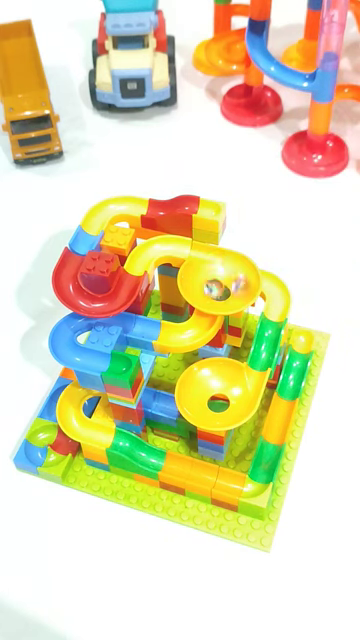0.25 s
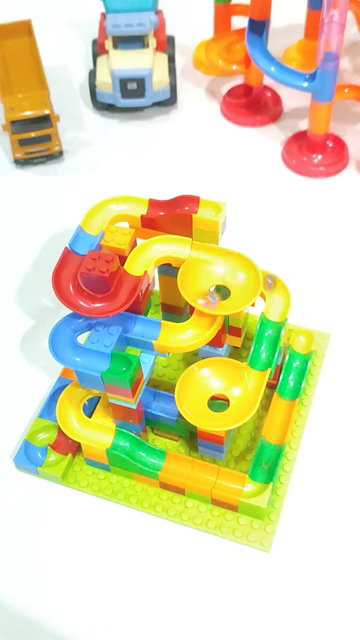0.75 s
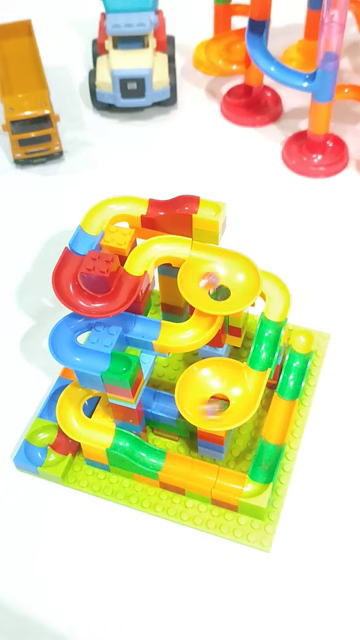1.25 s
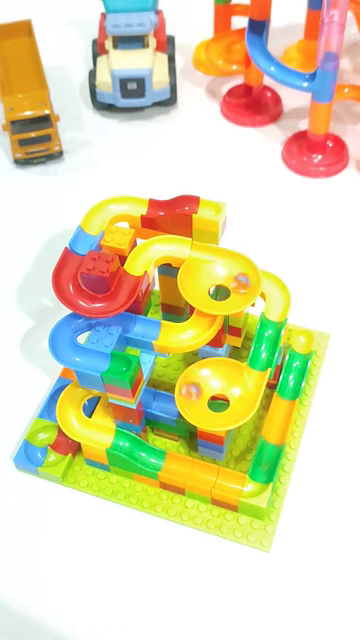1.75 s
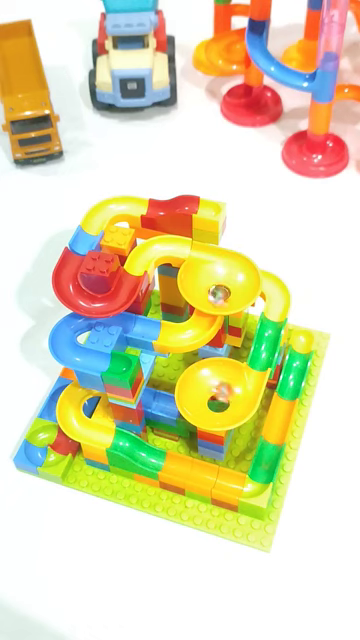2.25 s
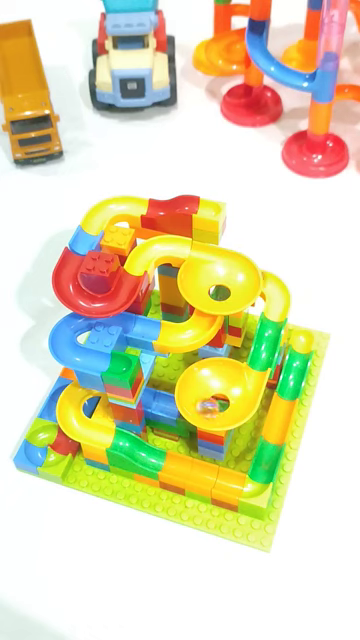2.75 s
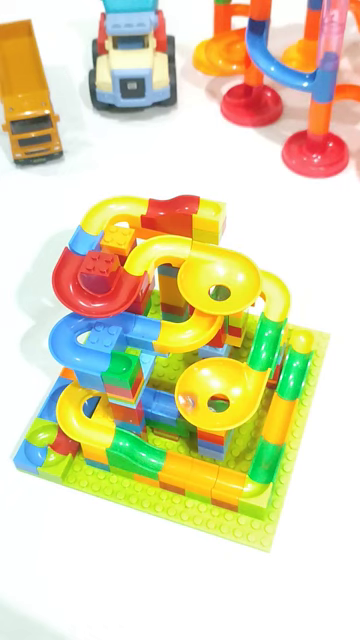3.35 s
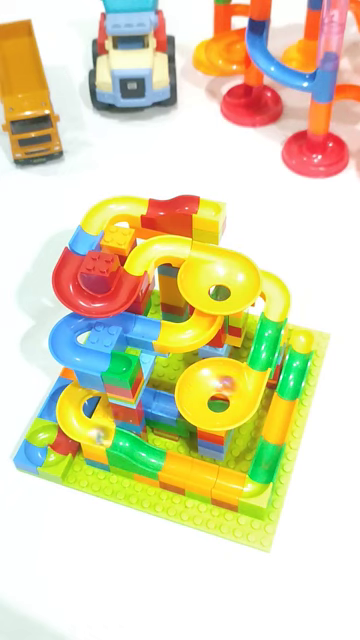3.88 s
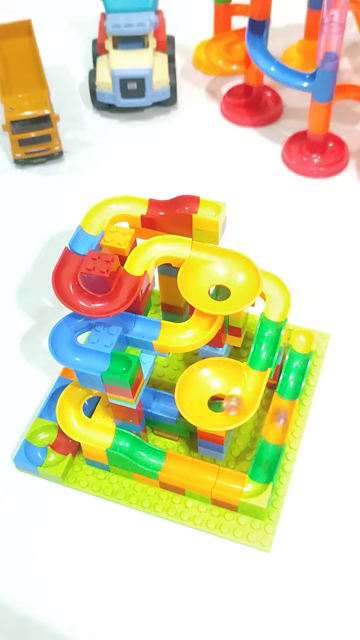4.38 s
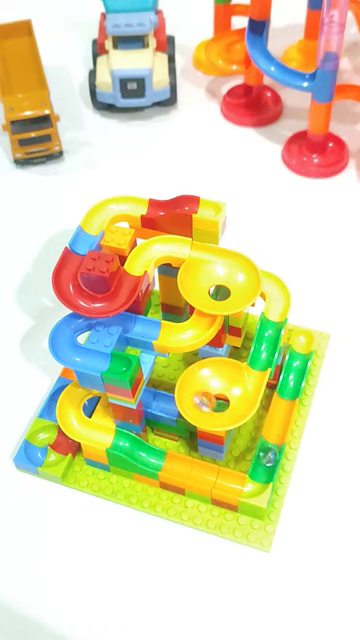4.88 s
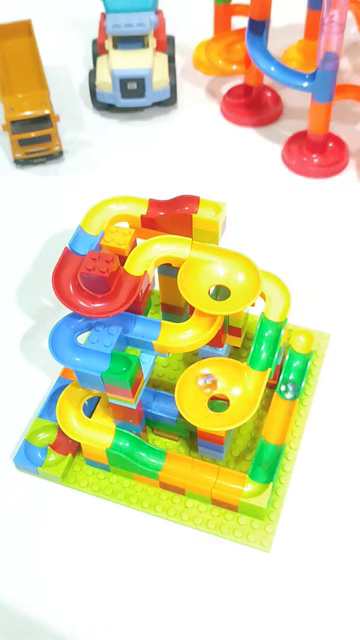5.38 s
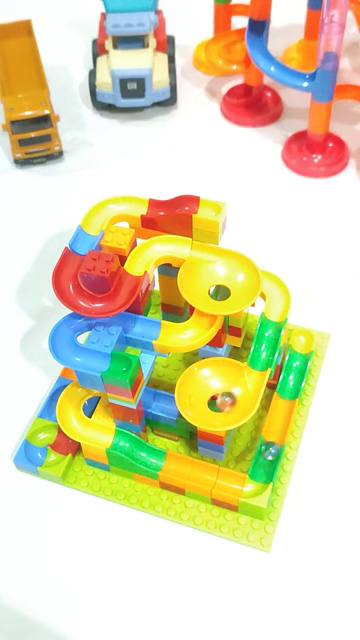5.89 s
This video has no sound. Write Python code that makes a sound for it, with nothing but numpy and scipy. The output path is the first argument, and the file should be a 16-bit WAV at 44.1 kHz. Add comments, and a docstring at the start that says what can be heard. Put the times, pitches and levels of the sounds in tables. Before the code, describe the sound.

Indoors, close to a toy track of hollow plastic, glass marbles are already rolling. Their grainy, mid-pitched rumble and lighter rasp pulse unevenly about six times a second as they swoop around funnels and bends. Small glass clinks come near 0.3 s; a clattering group of clacks and a bouncing drop follows at 0.65-0.85, another drop at 1.2. From 1.4 to 2.5 the rolling is softer, with sparse light taps. Drops and knocks thicken at 2.7, another rebounding drop lands at 3.2, and the hardest, sharpest clack strikes at 3.5, followed by quick knocks. Between 4.1 and 4.4 bright, very short glass clinks crowd together over thinner rolling. A double-bounce drop sounds at 4.6, crisp clinks at 5.2, then softer rolling, a last swell near 5.65 and tiny ticks to 6.1. Brief bright room echoes, faint noise and wavering low hum remain underneath.

```python
"""Glass marbles roll down a plastic toy track: streams of tiny bumps ring through its resonances,
swelling about six times a second as marbles swoop round funnels and bends.
Marbles drop and knock on hollow plastic: many short, dying tones make the boom, clack and tick.
Clinks of glass are very short bursts of coloured noise. A small, hard-walled room answers with
echoes, over faint noise and a wavering hum."""
import sys
import numpy as np
from scipy import signal
from scipy.fft import rfft, irfft, next_fast_len
from scipy.io import wavfile
from scipy.ndimage import uniform_filter1d

SR = 44100
rng = np.random.default_rng(int(sys.argv[2]) if len(sys.argv) > 2 else 0)


def unload_wav(signal):
    """Save mono or channel-first audio to the path in sys.argv[1] as 16-bit WAV at rate SR, clipped to [-1, 1]."""
    wavfile.write(
        sys.argv[1],
        SR,
        np.round(np.clip(np.atleast_2d(signal).T, -1, 1) * 32767).astype(np.int16),
    )


N = 270333
TIME = np.arange(N) / SR
AGE = TIME[:int(.09 * SR)]   # seconds since a blow began


def from_db(db):
    """Turn decibels into a plain gain."""
    return 10 ** (np.asarray(db) / 20)


def rms_one(x):
    """Scale to an rms of 1."""
    return x / np.sqrt(np.mean(x ** 2) + 1e-20)


def attack_one(sound):
    """Scale a blow to rms 1 over its first 8 ms."""
    return sound / np.sqrt(np.mean(sound[:, :SR // 125] ** 2))


def at_hz(points, hz, axis=1):
    """Read one column of a table on a log-frequency axis."""
    points = np.array(points)
    return np.interp(np.log(np.maximum(hz, 1)), np.log(points[:, 0]), points[:, axis])


def filtered(sound, order, edge_hz, kind):
    """Keep only the part of a sound that the chosen filter lets through."""
    return signal.sosfilt(signal.butter(order, edge_hz, kind, fs=SR, output="sos"), sound)


def add(out, s, sound, pan_db):
    """Mix a stereo sound in at a time and a place; positive pan leans left."""
    start = max(round(s * SR), 0)
    gains = rms_one(from_db([[pan_db / 2], [-pan_db / 2]]))
    out[:, start:start + sound.shape[1]] += (gains * sound)[:, :max(N - start, 0)]


def drift(rate):
    """Smooth chance with spread 1, heading for a new value `rate` times a second."""
    knots = rng.standard_normal(4096)
    return np.interp(TIME * rate, np.arange(len(knots)), knots) * np.sqrt(3 / 2)


def ripple(hz, spacing_hz):
    """Chance hills and valleys over frequency, spread about 1: they depend on where the blow lands."""
    return np.interp(hz / spacing_hz, np.arange(256), rng.standard_normal(256)) * np.sqrt(3 / 2)


def bump(hz, centre, octaves):
    """A hill of height 1 on the pitch axis."""
    return 1 / (1 + (np.log2(hz / centre) / octaves) ** 2)


# How alike left and right are: pitch_hz, likeness (0 to 1)
LEFT_RIGHT_LIKENESS = [(50, 0.78), (300, 0.27), (700, 0.89), (1400, 0.68), (3000, 0.51), (6000, 0),
                       (14000, 0.03)]


def spread(mid, side, hz):
    """Two unrelated signals become left and right, as alike as the table says at each pitch."""
    alike = np.clip(at_hz(LEFT_RIGHT_LIKENESS, hz), -.99, .99)
    return np.sqrt(1 + alike) * mid + np.sqrt(1 - alike) * side * np.array([[1], [-1]])


def coloured(pair, colour):
    """Two unrelated signals become a stereo sound shaped by a colour table; rms 1."""
    size = next_fast_len(N)
    hz = np.arange(size // 2 + 1) * SR / size
    spectrum = spread(*rfft(pair, size), hz) * from_db(at_hz(colour, hz))
    return rms_one(irfft(spectrum, size)[:, :N])


# Colour of the still room's noise: pitch_hz, relative_level_db
AIR_COLOUR = [(20, -37.5), (31, -1.5), (41, 3.5), (55, -1.5), (80, -1), (100, -9), (128, -7), (200, -16),
              (330, -20.5), (700, -21.5), (1500, -32.5), (3500, -31.5), (8000, -39.5), (14000, -41.5)]
# Faint hum tones before their swell: pitch_hz, level_db
HUM_TONES = [(80, -76), (161, -76)]
# Slow swell of the hum: time_s, gain_db
HUM_SWELL = [(0, 0), (1.6, 9.5), (2.3, -0.5), (3.2, 4), (3.8, -5.5), (6.1, 2)]


def still_room(air_db=-63, waver_db=2):
    """Coloured noise makes low rumble and faint hiss; sines of wavering level and phase make the hum."""
    sound = from_db(air_db) * coloured(rng.standard_normal((2, N)), AIR_COLOUR)
    swell_db = np.interp(TIME, *np.transpose(HUM_SWELL))
    for hz, db in HUM_TONES:
        level = from_db(db + swell_db + waver_db * drift(1.5))
        sound = sound + level * np.sin(2 * np.pi * hz * TIME + .5 * drift(2.07))
    return sound * from_db([[-.6], [.6]])   # a little stronger on the right


# The room's echoes: pitch_hz, time_to_fall_60_db_s, echo_energy_against_direct_sound_db
ROOM_ECHOES = [(390, 0.27, -12), (1260, 0.19, -6.5), (3020, 0.26, -6), (6970, 0.36, -7),
               (14000, 0.25, -6.5)]


def room(x, build_s=0.0053, thicken_s=.05):
    """Separate early reflections thicken into a tail that dies band by band."""
    age = TIME[:int(.6 * SR)]
    edges = np.geomspace(250, 17000, 11)
    density = np.minimum(.015 + .05 * (age / thicken_s) ** 2, 1)   # reflections per sample
    arrivals = (rng.random(len(age)) < density) / np.sqrt(density)
    response = 0
    for low, high in zip(edges, edges[1:]):
        hz = np.sqrt(low * high)
        echoes = filtered(arrivals * rng.standard_normal((2, len(age))), 2, [low, high], "band")
        decay = from_db(-60 * age / at_hz(ROOM_ECHOES, hz))
        build = 1 - np.exp(-(age / build_s) ** 2)
        tail = rms_one(spread(*echoes, hz) * decay * build)
        band_share = np.sqrt(2 * (high - low) / SR / len(age))   # a wider band holds more energy
        response = response + tail * from_db(at_hz(ROOM_ECHOES, hz, axis=2)) * band_share
    return signal.fftconvolve(x, response, axes=1)[:, :N]


def grazes(count=14, level_db=-64):
    """Faint grazing touches of glass at random moments."""
    return [(when * N / SR, level_db, 0) for when in rng.random(count)]


# Glass clinks on another marble or a hard edge: start_s, level_db (energy as if over 3 ms),
# brightness_db (treble tilt per octave, up to 0.6 octave either side of 9500 Hz)
GLASS_CLINKS = [(0.074, -42.5, -26), (0.2533, -39, -4), (0.2701, -36, 4), (0.2901, -54, -6),
                (0.3146, -46.5, 3), (0.5922, -47.5, 3), (0.615, -57, 4), (1.186, -43, 2), (1.2365, -49, -6),
                (1.5924, -53, 9), (1.6189, -54, 3), (1.6386, -52.5, 3), (1.7101, -44, 4.5),
                (1.99, -54.5, -4), (2.0607, -47, 0), (2.0819, -47.5, -2), (2.403, -49.5, -9),
                (2.5137, -47.5, 3), (3.7756, -53, -5), (3.8231, -47.5, -8), (3.8297, -51, -10),
                (3.8866, -44.5, 1), (4.0147, -49, -3), (4.098, -29.5, 2), (4.199, -29, -1),
                (4.2892, -30, 6), (4.3484, -33, 3), (4.3534, -47, -4), (4.3604, -34.5, -4),
                (4.3652, -38, -2), (4.398, -28, 1), (4.7227, -50.5, -4), (4.7442, -41.5, -4.5),
                (4.839, -49.5, -10), (5.053, -54.5, -5), (5.0899, -52, -5), (5.2065, -31, 0),
                (5.2163, -28, 1.5), (5.3605, -40.5, -5), (5.5871, -47.5, -6), (5.6179, -39.5, -4),
                (5.6365, -39, -4), (5.7087, -51, 1), (5.7328, -37.5, 1), (5.8844, -48.5, -13),
                (6.0042, -50, -4)]
# Colour of a clink: pitch_hz, relative_level_db
GLASS_COLOUR = [(600, -53), (1500, -7), (2500, -8.5), (4000, -4), (6000, 1.5), (7700, 5), (9700, -1),
                (12300, 0.5), (13800, -0.5), (15500, -47)]


def clinks(crack_s=0.00028, ring_s=0.0072, ring_db=-14, patchy_db=3, room_db=2, pan_db=-2.5):
    """Glass on glass: a crack under a millisecond, scattered briefly by the track.

    Gives the direct sound and what is sent to the room."""
    direct, feed = np.zeros((2, 2, N))
    size = 1024
    age = AGE[:size]
    hz = np.arange(size // 2 + 1) * SR / size
    fade = np.exp(-age / crack_s) + from_db(ring_db) * np.exp(-age / ring_s)
    fade = fade * (1 - np.exp(-age / .0001))   # a very short fade-in softens the clink's start
    for s, level_db, bright_db in list(GLASS_CLINKS) + grazes():
        tilt_db = bright_db * np.clip(np.log2((hz + 1) / 9500), -.6, .6)
        colour = from_db(at_hz(GLASS_COLOUR, hz) + tilt_db + patchy_db * ripple(hz, spacing_hz=703))
        phases = np.exp(2j * np.pi * rng.random((2, len(hz))))
        crack = filtered(irfft(colour * phases) * fade, 2, 1100, "high")
        energy = np.sum(crack ** 2, axis=1, keepdims=True)
        crack = from_db(level_db) * crack / np.sqrt(energy / (.003 * SR))
        add(direct, s, crack, pan_db)
        add(feed, s, crack * from_db(room_db), 0)
    return direct, feed


def resonance_db(resonances, hz, between_db):
    """Gain of a set of resonances, with shallow valleys between them."""
    power = from_db(between_db) ** 2
    for centre, width, db in resonances:
        power = power + from_db(db) ** 2 / (1 + (2 * (hz - centre) / width) ** 2)
    return 10 * np.log10(power)


# Resonances of the stacked blocks that every blow shakes: pitch_hz, width_hz, gain_db
BLOCK_RESONANCES = [(551, 12, 7.5), (765, 35, 1.5), (1118, 20, 6.5), (1370, 96, -9), (1428, 40, 3),
                    (1646, 60, 5.5), (2815, 89, -6.5), (3484, 22, -15.5), (3580, 24, -12), (4170, 94, -1.5),
                    (4980, 35, 7), (6130, 180, -1.5), (6740, 99, 3), (7640, 240, 3.5), (8430, 230, 1.5)]


def plastic(colour, t60, count):
    """Crowded modes (natural tones) of a moulded piece: their pitches, levels in dB and dying sines."""
    hz = np.geomspace(colour[0][0], colour[-1][0], count) * (1 + rng.uniform(-.003, .003, count))
    decay_s = t60 * from_db(rng.normal(0, 2.45, (count, 1)))   # each mode dies at its own pace
    level_db = at_hz(colour, hz) + resonance_db(BLOCK_RESONANCES, hz, between_db=-3.5)
    sines = np.sin(2 * np.pi * hz[:, None] * AGE) * from_db(-60 * AGE / decay_s)
    return hz, level_db, sines


def strike(modes, accent_db):
    """Each blow meets the modes with new signs and its own accent."""
    hz, level_db, sines = modes
    mid, side = rng.choice([-1, 1], (2, len(hz)))
    return attack_one((spread(mid, side, hz) * from_db(level_db + accent_db)) @ sines)


def ping(hz, t60):
    """The one mode right under the marble; the two sides hear it a little out of step."""
    lag_s = rng.normal(0, 5e-5, (2, 1))
    return attack_one(np.sin(2 * np.pi * hz * (AGE + lag_s)) * from_db(-60 * AGE / t60))


def blow_sounds(blows, peak_octaves=0.13, snap_s=0.012, wall_trim_db=-1.0, tick_trim_db=-1.5):
    """A marble lands on plastic: the hollow piece booms, its thin wall clacks, the contact ticks."""
    cavity = plastic([(430, -21.5), (600, -14.5), (850, -2.0), (1200, 3), (2050, 3.0)], t60=0.098, count=130)
    wall = plastic([(2000, -1.5), (3300, -0.5), (4200, -3), (4800, -9.5)], t60=0.044, count=120)
    tick = plastic([(4700, 3.5), (7500, 3.5), (10000, -4), (13000, -4), (15000, -23)], t60=0.039, count=170)
    out = np.zeros((2, N))
    for s, cavity_hz, boom_db, wall_hz, clack_db, contact_db, snap_db, pan_db in blows:
        hardness = from_db(np.clip(snap_db, -6, 13))
        snap = 1 + (hardness - 1) * np.exp(-AGE / snap_s)   # a hard blow sheds most of its energy at once
        boom = strike(cavity, 8 * bump(cavity[0], cavity_hz, peak_octaves))   # 8 dB peak
        boom = boom + from_db(-5) * ping(cavity_hz, t60=0.063)
        clack = strike(wall, 9 * bump(wall[0], wall_hz, peak_octaves))   # 9 dB peak
        clack = clack + from_db(-10) * np.sqrt(hardness) * ping(wall_hz, t60=0.019)
        contact = strike(tick, 5 * ripple(tick[0], spacing_hz=297.8))   # patchy by about 5 dB
        blow = from_db(boom_db) * attack_one(boom)
        blow = blow + from_db(clack_db + wall_trim_db) * attack_one(clack * snap)
        blow = blow + from_db(contact_db + tick_trim_db) * attack_one(contact * snap)
        add(out, s, blow, pan_db)
    return filtered(out, 3, 480, "high")   # small pieces radiate no bass


def chatter(hits, blows, again_db=-22):
    """Loose pieces touch twice more, about 6 to 19 milliseconds after a blow."""
    out = np.zeros((2, N))
    high = filtered(hits, 2, 1500, "high")
    delays_s = rng.uniform(0.0057, 0.019, (len(blows), 2))
    for (s, *_), pair in zip(blows, delays_s):
        start = round(s * SR)
        touch = high[:, start:start + 256]
        touch = touch * np.exp(-AGE[:touch.shape[1]] / .0015)
        for delay_s in pair:
            add(out, s + delay_s, from_db(again_db) * touch, 0)
    return out


# Marbles knock on plastic: a rolling marble hits a wall or joint, or a dropped marble bounces again; # clack
# and tick levels are before their shared trims: # start_s, cavity_pitch_hz, cavity_level_db, wall_pitch_hz,
# wall_level_db, tick_level_db
WALL_KNOCKS = [(0.0554, 1593, -43.5, 2460, -35.5, -37.5), (0.2185, 1410, -49, 2130, -49, -50),
               (0.2282, 1080, -49, 2180, -46, -59), (0.4134, 1880, -53.5, 2780, -57, -79),
               (0.591, 1064, -49.5, 2600, -49.5, -68), (0.602, 1120, -66, 2200, -54, -71),
               (0.6549, 1060, -47.5, 2670, -47, -49), (0.6908, 1300, -38.5, 3730, -30, -42.5),
               (0.7228, 1360, -51, 3520, -42, -46), (0.7732, 1640, -49, 3060, -47, -66),
               (0.787, 1610, -45, 3100, -39.5, -50), (0.8205, 1460, -42, 2580, -37, -52),
               (0.8482, 1530, -46.5, 2700, -37, -54), (1.0052, 1440, -51, 2140, -50, -88),
               (1.2094, 1680, -47, 2880, -63, -55), (1.3983, 1120, -55, 3000, -50, -71),
               (1.4068, 1410, -51, 2950, -42, -56), (1.4659, 1130, -64, 3000, -58, -69),
               (1.4922, 1130, -59, 3200, -53.5, -61), (1.603, 736, -54.5, 2400, -59, -64),
               (1.785, 1530, -62, 3100, -59, -81), (2.0878, 1440, -56, 2190, -52.5, -62),
               (2.464, 1400, -49.5, 2600, -47, -70), (2.471, 1126, -45.5, 2790, -52.5, -53.5),
               (2.5954, 1810, -50.5, 2620, -48.5, -58), (2.6582, 1560, -43.5, 2880, -46, -51),
               (2.6782, 1100, -46.5, 3600, -51, -54), (2.7129, 1320, -40, 3860, -32, -39.5),
               (2.8314, 1590, -43, 3100, -40.5, -57.5), (2.868, 1420, -46.5, 2570, -38, -55),
               (2.878, 1470, -46, 2680, -46, -64), (3.081, 1610, -54.5, 2330, -54.5, -83),
               (3.1126, 1510, -55, 2640, -55.5, -89), (3.4734, 1170, -48, 3020, -50, -55),
               (3.5123, 1098, -37.5, 3030, -53, -57), (3.586, 1230, -44.5, 4300, -45, -64),
               (3.6286, 1067, -40.5, 2700, -41.5, -55), (3.6635, 1980, -44, 2470, -42, -52.5),
               (3.6987, 1760, -43, 3410, -38, -52.5), (4.0235, 1550, -54.5, 2980, -54.5, -58),
               (4.088, 1750, -56, 2230, -50, -50), (4.1765, 1570, -48, 2200, -44, -45),
               (4.1963, 1980, -45, 2430, -44.5, -43), (4.2422, 1740, -58, 3750, -44, -49),
               (4.3191, 1220, -51, 2390, -35, -43.5), (4.3399, 1110, -44, 4000, -40.5, -45),
               (4.3977, 1800, -45.5, 2720, -38.5, -52), (4.3637, 1450, -48.5, 2420, -52, -56),
               (4.5108, 1165, -50, 2670, -44, -52.5), (4.641, 1620, -55, 2490, -44, -53),
               (4.9056, 1330, -51.5, 2600, -58, -68), (4.8063, 1640, -45.5, 3660, -42, -47),
               (4.9414, 1057, -47, 2450, -48, -61), (5.1653, 1280, -52, 2640, -49.5, -62),
               (5.341, 1660, -46, 3500, -50.5, -78), (5.8875, 1230, -50.5, 2940, -55, -74)]
TAP_COUNT = 8   # light taps while rolling
TAP_CAVITY_DB, TAP_WALL_DB, TAP_TICK_DB = -9, -5.5, -20   # against the rumble, before the trims
TAP_CAVITY_HZ, TAP_WALL_HZ, PIECE_SPREAD_OCTAVES = 1370, 2680, 0.11   # pitch differs from piece to piece


def wall_blows(rumble_db, snap_db=0.5, pan_spread_db=2):
    """Knocks from the table, and light random taps whose strength follows the rumble's level."""
    rows = list(WALL_KNOCKS)
    for when, piece in rng.random((TAP_COUNT, 2)):
        i = int(when * N)
        db = rumble_db[i]
        pitch = 2 ** (PIECE_SPREAD_OCTAVES * (2 * piece - 1))
        rows.append((TIME[i], pitch * TAP_CAVITY_HZ, db + TAP_CAVITY_DB,
                     pitch * TAP_WALL_HZ, db + TAP_WALL_DB, db + TAP_TICK_DB))
    places = rng.standard_normal(len(rows))
    return [(*row, snap_db, pan_spread_db * place) for row, place in zip(rows, places)]


# A marble drops onto a piece and rebounds; wall and tick levels are before their shared trims:
# start_s, cavity_pitch_hz, cavity_level_db, wall_pitch_hz, wall_level_db, tower_thud_level_db,
# first_instant_snap_db (kept within -6 to 13 when played), left_against_right_db,
# rebound_delay_s, rebound_against_landing_db, rebound_tick_against_clack_db
MARBLE_DROPS = [(0.6773, 1270, -38.5, 3280, -33.5, -67, -2, 4, 0.0234, -2, -9),
                (1.1851, 1160, -41.5, 3040, -36.5, -50, 4, 0, 0.051, -7, 0),
                (2.7024, 1377, -40.5, 3800, -37.5, -55, -5, -0.5, 0.0175, 1.5, -9),
                (3.2273, 1250, -39.5, 3040, -35.5, -51.5, -5, 0, 0.055, -5, -1.5),
                (3.504, 1090, -37, 3200, -24, -53, 20, 1, 0.0372, -5.5, -9.5),
                (4.5808, 1630, -37.5, 3570, -37, -69, 6, 0, 0.039, 1, -9)]


def thuds(rebound_thud_db=-3):
    """A drop and its rebound also shake the tower of blocks under the piece."""
    tower = plastic([(440, -10.5), (570, 4.5), (760, 10)], t60=0.064, count=16)
    out = np.zeros((2, N))
    for s, _, _, _, _, thud_db, _, pan_db, gap_s, *_ in MARBLE_DROPS:
        add(out, s, from_db(thud_db) * strike(tower, 0), pan_db)
        add(out, s + gap_s, from_db(thud_db + rebound_thud_db) * strike(tower, 0), pan_db)
    return filtered(out, 2, 350, "high")


def drop_blows(landing_tick_db=-5.5, settle_share=0.9, settle_db=-21.5):
    """Each drop lands, rebounds and settles with one small bounce, set against the rebound."""
    blows = []
    for (s, cavity_hz, boom_db, wall_hz, clack_db, _, snap_db, pan_db,
         gap_s, rebound_db, rebound_tick_db) in MARBLE_DROPS:
        landings = [(s, 0, landing_tick_db),
                    (s + gap_s, rebound_db, rebound_tick_db),
                    (s + gap_s * (1 + settle_share), rebound_db + settle_db, rebound_tick_db)]
        for at, db, tick_db in landings:
            blows.append((at, cavity_hz, boom_db + db, wall_hz, clack_db + db,
                          clack_db + db + tick_db, snap_db + db, pan_db))
    return blows


# Rolling beneath the swoops: it rises and sinks, loudest near 2.8 and 4.35 s, faintest at the end:
# time_s, rumble_level_db, rasp_level_db
STEADY_ROLL = [(0.0, -61, -67.5), (0.85, -60.5, -62), (1.3, -63.5, -71), (2.5, -66.5, -68),
               (2.8, -57, -60.5), (3.15, -65.5, -76), (3.9, -61, -64), (4.35, -57, -63), (4.68, -65, -66),
               (5.35, -64.5, -76), (5.55, -69.5, -76.5), (6.12, -70, -75.5)]
# A marble swoops past a funnel's hole or round a bend: peak_s, rumble_level_db, rasp_level_db
# (added to the rolling beneath as power)
MARBLE_SWOOPS = [(0.01, -55.5, -53.5), (0.29, -55.5, -58.5), (0.43, -59.5, -57.5), (0.485, -62.5, -65),
                 (0.609, -57.5, -54.5), (0.77, -52, -49.5), (0.86, -55, -58), (0.93, -56, -61),
                 (1.03, -59, -63), (1.22, -53, -54), (1.39, -56, -62.5), (1.45, -56.5, -60),
                 (1.593, -58, -58), (1.801, -57.5, -60), (2.009, -58.5, -58.5), (2.07, -60, -64.5),
                 (2.23, -60, -64.5), (2.4, -62, -68), (2.612, -52, -52.5), (2.68, -50.5, -51),
                 (2.9, -57.5, -56), (3.268, -50, -51), (3.44, -57, -63.5), (3.6, -58, -50.5),
                 (3.83, -59, -62.5), (4.05, -72, -56.5), (4.26, -73, -49.5), (4.42, -57, -56),
                 (4.529, -53.5, -55), (4.762, -56.5, -60), (4.86, -56, -65), (4.962, -56.5, -60.5),
                 (5.13, -58.5, -65), (5.21, -59.5, -61), (5.29, -61, -67), (5.659, -55, -62.5)]


def roll_levels(rise_s=0.029, fall_s=0.037):
    """Rumble and rasp in dB: the rolling beneath, plus a swell that rises and falls at every swoop."""
    s, *steady_db = np.transpose(STEADY_ROLL)
    times = TIME[::SR // 1000]
    power = from_db([np.interp(times, s, db) for db in steady_db]) ** 2
    for at, *peak_db in MARBLE_SWOOPS:
        width_s = np.where(times < at, rise_s, fall_s)
        swell = np.exp(-((times - at) / width_s) ** 2)
        power = power + np.outer(from_db(peak_db) ** 2, swell)
    return [np.interp(TIME, times, 10 * np.log10(p)) for p in power]


def narrow_gutter(roll, from_s=4.3, until_s=4.4, share=0.55, lowest_hz=1000):
    """The last straight gutter is narrower than the funnels and gives less of the low rumble."""
    thin = filtered(roll, 2, lowest_hz, "high")
    there = np.clip((TIME - from_s) / (until_s - from_s), 0, 1) * share
    return np.sqrt(1 - there) * roll + np.sqrt(there) * thin


# Resonances of the funnels and gutters: pitch_hz, width_hz, gain_db (before it wanders)
FUNNEL_RESONANCES = [(776, 79, 7), (966, 21, 5.5), (1092, 41, 6.5), (1178, 75, 2), (1403, 71, -2),
                     (1538, 22, 1.5), (1832, 110, 3), (2243, 43, 2), (2446, 77, -3), (2610, 93, 2.5),
                     (2988, 140, 2.5)]


def rolling(level_db, colour, bumps_per_s=700, size_db=0.5, judder_db=2.0, judder_rate=80,
            valley_db=-9, wander_db=4, wander_rate=11):
    """A rolling marble taps countless tiny bumps; which resonances answer changes as it moves on."""
    sizes = from_db(size_db * np.minimum(rng.exponential(1, N), 4)) * rng.choice([-1, 1], (2, N))
    touching = rng.random(N) < bumps_per_s / SR
    taps = sizes * touching * from_db(judder_db * drift(judder_rate))
    taps = coloured(taps, colour)
    ringing = from_db(valley_db) * taps
    for hz, width, db in FUNNEL_RESONANCES:
        answer = signal.lfilter(*signal.iirpeak(hz, hz / width, fs=SR), taps)
        ringing = ringing + from_db(db + wander_db * drift(wander_rate)) * answer
    power = uniform_filter1d(np.mean(ringing ** 2, axis=0), SR // 16)
    even = ringing / np.sqrt(np.abs(power) + 1e-6)   # slow loudness changes are evened out
    return from_db(level_db) * even


# Colour of the low rolling sound: pitch_hz, relative_level_db
RUMBLE_COLOUR = [(300, -14), (520, -4), (760, 1), (1150, 3.5), (1650, 7.5), (2100, -18.5), (3000, -19.5)]
# Colour of the high rolling sound: pitch_hz, relative_level_db
RASP_COLOUR = [(1500, -18.5), (2200, 2), (3200, -7.5), (4000, -13), (5000, -14), (8000, -9), (14000, -81)]


def scene(roll_room_db=-6):
    """Rolling, knocks and clinks sound directly and in the room, over the still room's own sound."""
    rumble_db, rasp_db = roll_levels()
    rumble = narrow_gutter(rolling(rumble_db, RUMBLE_COLOUR))
    roll = rumble + rolling(rasp_db, RASP_COLOUR)
    blows = drop_blows() + wall_blows(rumble_db)
    hits = blow_sounds(blows)
    hits = hits + chatter(hits, blows) + thuds()
    glass, glass_feed = clinks()
    echoes = room(hits + glass_feed + from_db(roll_room_db) * roll)
    return roll + hits + glass + echoes + still_room()


def record(dry, soft_hz=14600, cutoff_hz=16400):
    """The highest treble rolls off and is then cut, 60 dB down from the cutoff upward."""
    soft = filtered(dry, 10, soft_hz, "low")
    return signal.sosfilt(signal.cheby2(14, 60, cutoff_hz, fs=SR, output="sos"), soft)


dry = scene()
out = record(dry)
unload_wav(out)
```